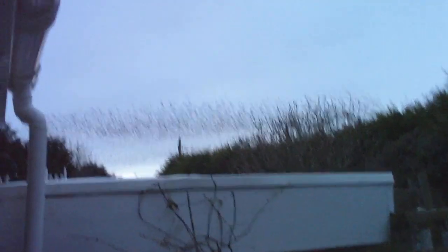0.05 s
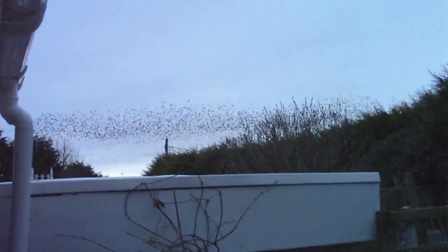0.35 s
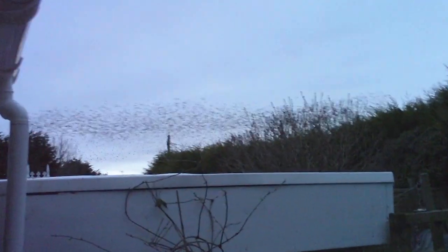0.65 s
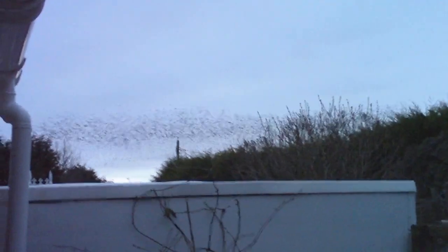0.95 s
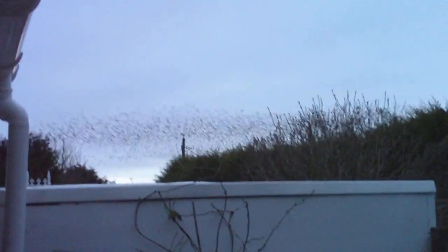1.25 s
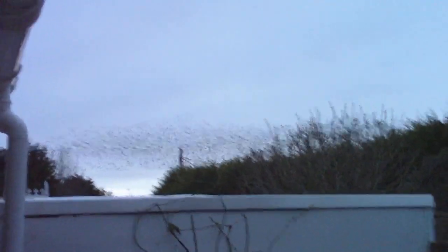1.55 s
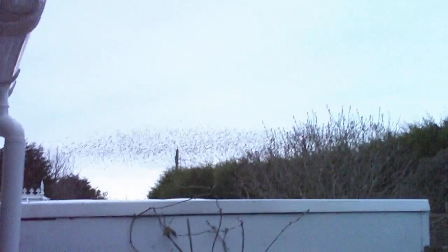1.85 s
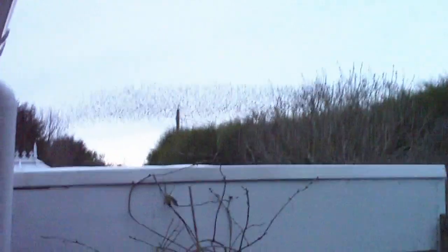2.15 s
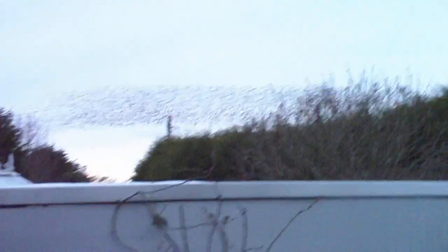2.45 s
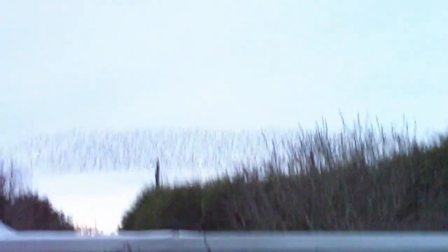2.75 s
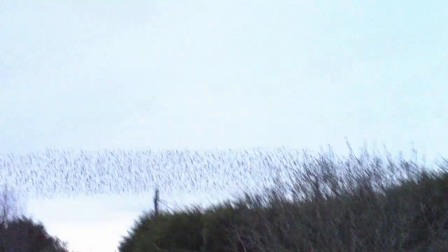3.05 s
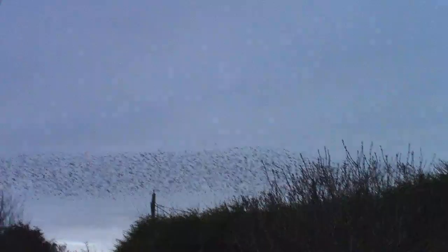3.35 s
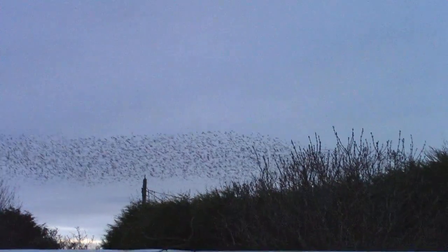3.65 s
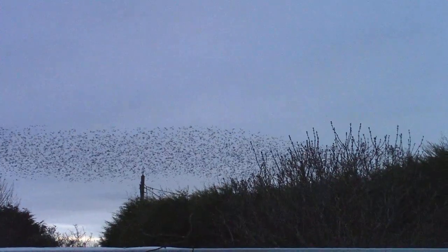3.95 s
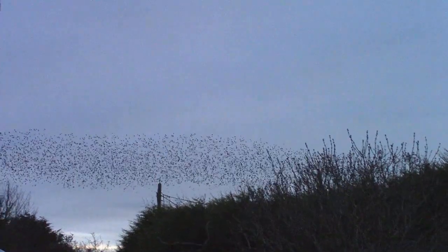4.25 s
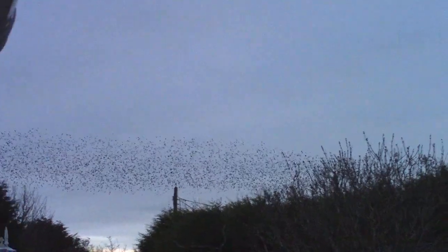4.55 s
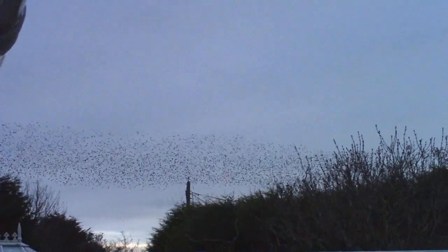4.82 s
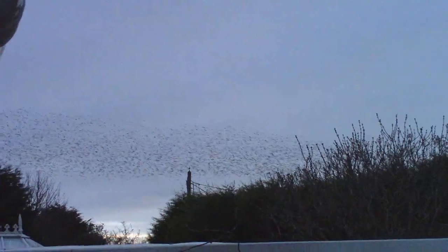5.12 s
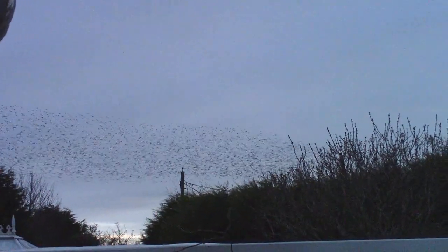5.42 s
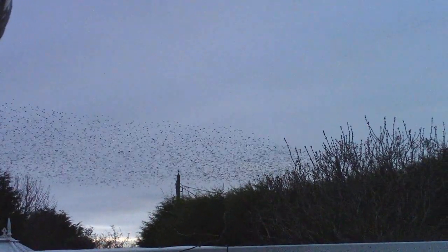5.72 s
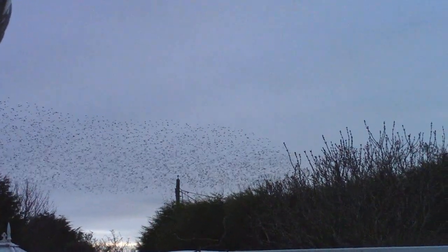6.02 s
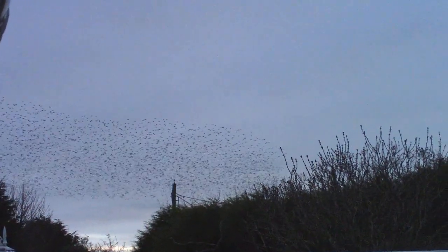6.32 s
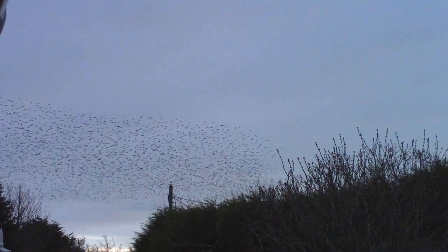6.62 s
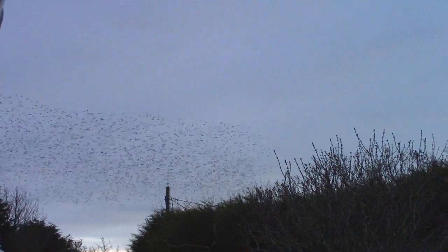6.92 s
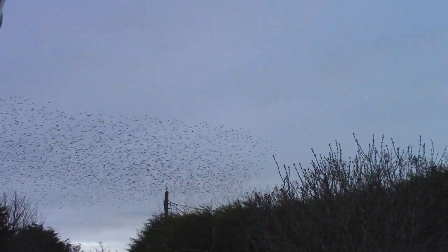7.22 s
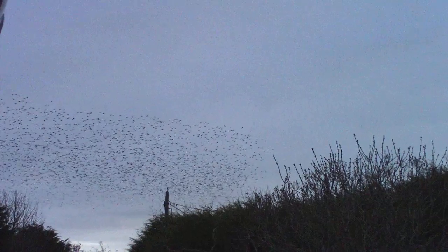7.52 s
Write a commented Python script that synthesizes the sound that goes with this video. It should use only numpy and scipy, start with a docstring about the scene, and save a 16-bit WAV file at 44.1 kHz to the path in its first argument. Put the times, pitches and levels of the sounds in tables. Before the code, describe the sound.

Soft open-air hiss and the dense, high chatter of many starlings run throughout, fairly quiet, in a garden. Brief squeaks, sliding whistles, trills and harsh rasps stand out from the distant flock and thicken in the last two seconds. The camera's plastic case snaps sharply now and then, much closer and louder than the birds, and its microphone picks up a very faint electronic whine.

```python
"""A soft outdoor wash and the babble of a large starling flock go on throughout, behind nearer calls.
The nearest birds whistle, rasp, buzz, chirp and yelp by blowing air through the syrinx, their two-sided
voice box; a garden wall and hedge throw the calls back. A hand-held camera, whose one microphone hears
it all, whines faintly, and now and then its plastic case clicks sharply."""
import sys
import numpy as np
from scipy import signal
from scipy.fft import rfft, irfft, next_fast_len
from scipy.io import wavfile
from scipy.ndimage import uniform_filter1d

SR = 44100
rng = np.random.default_rng(int(sys.argv[2]) if len(sys.argv) > 2 else 0)


def materialize(psi):
    """Save the field psi as 16-bit PCM at rate SR to the path in sys.argv[1].

    A 1-D psi becomes a single channel; in a 2-D psi each row is a channel.
    """
    bounded = np.clip(np.atleast_2d(psi).T, -1, 1)
    quanta = np.round(bounded * 32767).astype(np.int16)
    wavfile.write(sys.argv[1], SR, quanta)


N = 338688
TIME = np.arange(N) / SR


def gain_of(db):
    """Turns decibels into a number to multiply by."""
    return 10 ** (np.asarray(db) / 20)


def unit_rms(x):
    """Scales a sound to an average strength (rms) of 1."""
    return x / np.sqrt(np.mean(x ** 2) + 1e-20)


def at_frequency(points, hz):
    """Looks up values between a table's frequencies, spaced by octaves."""
    f, value = np.transpose(points)
    return np.interp(np.log(hz + 1), np.log(f + 1), value)


def add(mix, start_s, sound):
    """Mixes a sound in at its start time."""
    part = mix[max(round(start_s * SR), 0):][:len(sound)]
    part += sound[:len(part)]


def play(table, call):
    """Makes one call for each row; the first column says when."""
    out = np.zeros(N)
    for start_s, *settings in table:
        add(out, start_s, call(*settings))
    return out


def band(x, hz, width_hz):
    """Keeps the sound near one frequency, at an rms of 1."""
    size = next_fast_len(len(x))
    f = np.fft.rfftfreq(size, 1 / SR)
    peak = 1 / (1 + ((f - hz) / width_hz) ** 2) ** 2
    return unit_rms(irfft(rfft(x, size) * peak, size)[:len(x)])


def noise(n):
    """White noise, at most half a second."""
    return rng.standard_normal(SR // 2)[:n]


def wander(n, rate_hz):
    """A random drift of about size 1."""
    return np.interp(np.arange(n) * rate_hz / SR, np.arange(512), rng.standard_normal(512))


def progress(length_s):
    """Runs from 0 to 1 through a call; named u below."""
    return np.linspace(0, 1, int(np.clip(length_s, .005, .45) * SR))


def swell(u, roundness):
    """Fades a call in and out; less roundness gives a flatter top."""
    return unit_rms(abs(np.sin(np.pi * u)) ** roundness * signal.windows.tukey(len(u), .42))


def phase(hz):
    """The angle a wave has turned through as its pitch changes."""
    return 2 * np.pi * np.cumsum(hz) / SR


def glide(u, hz, octaves):
    """A pitch that slides steadily, passing hz halfway."""
    return hz * 2 ** (octaves * (u - .5))


# tone colour of the open air and the farthest birds: f/Hz, relative level/dB
AIR_COLOUR = [(25, 3), (59, 2), (140, -7.5), (253, -0.5), (349, -6), (500, -3), (650, -6), (900, -3.5),
              (1400, -8), (2500, 1), (4000, -6), (5700, -5), (8100, -10.5), (10600, -19), (12200, -18.5),
              (15500, -24.5)]
# how hard the flock chatters: t/s, relative level/dB
CHATTER_WAVES = [(0, 1), (.6, -1.5), (.92, -5.5), (1.35, 7), (2.3, -2.5), (2.9, 4), (3.45, 9), (4.6, 2),
                 (4.95, 0.5), (5.8, 13), (6.3, 7), (6.82, 9), (7.25, 10), (7.6, 4)]


def outdoor_air(level_db=-52.5, patchy_db=1.79, babble_share=0.42, size=1024):
    """A soft wash with drifting patches; its treble, the farthest birds, ebbs with the chatter."""
    hz = np.fft.rfftfreq(size, 1 / SR)
    real, imag, patches = rng.standard_normal((3, len(hz), 4 * N // size + 5))
    patches = uniform_filter1d(patches, size=10, axis=0)  # smooth across pitch
    patches = unit_rms(uniform_filter1d(patches, size=14, axis=1))  # and across time
    chatter = np.interp(np.linspace(0, N / SR, real.shape[1]), *np.transpose(CHATTER_WAVES))
    bird_range = np.exp(-((hz - 5600) / 2300) ** 2)
    babble_db = babble_share * np.outer(bird_range, chatter)
    colour_db = at_frequency(AIR_COLOUR, hz)[:, None] + patchy_db * patches + babble_db
    spectrum = (real + 1j * imag) * gain_of(colour_db)
    wash = signal.istft(spectrum, nperseg=size, noverlap=size - size // 4)[1][:N]
    return gain_of(level_db) * unit_rms(wash)


def far_flock(calls_per_kind=130):
    """Distant birds call at random: mellow whistles go on evenly, shrill calls come in waves."""
    mellow, shrill = np.zeros((2, N))
    for _ in range(calls_per_kind):
        low_shift, high_shift, rasp_shift, closeness, slide = rng.uniform(-2, 2, 5)
        length_s = rng.uniform(.03, .09)
        low_hz, high_hz = 2700 * np.exp(.17 * low_shift), 5700 * np.exp(.16 * high_shift)
        calls = [whistle(length_s, high_hz, slide - 1, db=-70),
                 chirp(5700 * np.exp(.06 * high_shift), db=-69),
                 buzz(length_s, high_hz, trill_hz=188, db=-70),
                 rasp(length_s, 3500 * np.exp(.18 * rasp_shift), db=-71.5, hiss_db=-77)]
        gain = gain_of(2.5 * closeness)
        add(mellow, rng.uniform(0, N / SR), gain * whistle(length_s, low_hz, slide, db=-67))
        for call in calls:
            add(shrill, rng.uniform(0, N / SR), gain * call)
    return mellow + shrill * gain_of(np.interp(TIME, *np.transpose(CHATTER_WAVES)))


def camera_whine(pulsing_db=-73, steady_db=-82, sizzle_db=-73, pulse_hz=15, switch_s=2.92):
    """Faint electronics: a thin sizzle, and a pulsing tone that gives way to a higher, steady one."""
    pulses = np.clip(4 * np.cos(2 * np.pi * pulse_hz * (TIME - .005)), 0, 1)
    pulsing = gain_of(pulsing_db) * unit_rms(pulses * np.sin(2 * np.pi * 11989 * TIME))
    steady = gain_of(steady_db) * unit_rms(np.sin(2 * np.pi * 14987 * TIME))
    sizzle = gain_of(sizzle_db) * band(rng.standard_normal(N), hz=7840, width_hz=170)
    return sizzle + np.where(TIME < switch_s, pulsing, steady)


def sing(hz, rough, waver=0.0094, flutter_db=3.5, overtone_db=-29):
    """One side of the voice box sings an almost pure tone, trembling a little."""
    n = len(hz)
    angle = phase(hz * (1 + waver * wander(n, 230.5) + rough * wander(n, 1007)))
    tone = np.sin(angle) + gain_of(overtone_db) * np.sin(2 * angle)
    return tone * gain_of(flutter_db * wander(n, 232))


# whistles, the low ones from far off: t/s, length/s, middle f/Hz, slide/(octaves per s), level/dB
WHISTLE_CALLS = [(0, 0.084, 2420, -1.4, -54.5), (.08, 0.1005, 2240, -0.7, -58),
                 (0.609, 0.047, 2000, 0.5, -58.5), (0.711, 0.059, 1341, 5, -57.5),
                 (1.373, .055, 3470, -4, -51.5), (1.86, 0.13, 4880, -2.1, -50.5),
                 (2.373, 0.069, 4100, .6, -56), (2.474, .12, 4950, -1, -46),
                 (2.891, 0.051, 2300, -0.5, -57.5), (3.09, .08, 4050, 0, -56), (3.21, .08, 2680, 1, -54.5),
                 (3.277, 0.095, 5250, -4, -49.5), (3.528, 0.042, 5130, 14.5, -46),
                 (3.883, .037, 1464, 1, -57.5), (4.075, 0.069, 4120, 4.5, -57.5),
                 (4.087, 0.057, 4920, -1, -58), (4.453, 0.071, 2930, -0.5, -56.5), (4.6, .06, 2440, 0, -58),
                 (4.889, 0.047, 4220, -3.5, -61), (5.338, 0.063, 4800, 0, -53.5),
                 (5.395, 0.15, 5420, -1.6, -52.5), (5.478, 0.1, 6350, -4.5, -50),
                 (7.03, 0.049, 2834, -4, -52.5)]


def whistle(length_s, hz, slide, db):
    """A clear note that slides up or down at a steady rate."""
    u = progress(length_s)
    tone = sing(glide(u, hz, slide * length_s), rough=0.018)
    return gain_of(db) * unit_rms(tone * swell(u, 0.059))


# how long the garden echoes: f/Hz, time to fade by 60 dB/s
ECHO_FADES = [(500, 0.036), (4000, 0.38), (12000, 0.072)]


def garden_echo(x):
    """Wall, house and hedge scatter the calls back; the middle treble lingers longest."""
    bounces = rng.standard_normal(SR // 2) * (rng.random(SR // 2) < .05)
    hz, t, spectrum = signal.stft(bounces, SR, nperseg=256)
    fade = gain_of(-60 * t / at_frequency(ECHO_FADES, hz)[:, None])
    tail = signal.istft(spectrum * fade, SR)[1]
    tail = np.r_[np.zeros(SR // 200), tail]  # arrives 5 ms late
    return signal.fftconvolve(x, tail / np.linalg.norm(tail))[:N]


def squeal(hz, ragged_db=4, overtone_db=-18):
    """One side of the voice box, blown too hard, gives a rough and broken tone."""
    n = len(hz)
    angle = phase(hz * (1 + .03 * wander(n, 260) + .05 * wander(n, 1600)))
    tone = np.sin(angle) + gain_of(overtone_db) * np.sin(2 * angle)
    return unit_rms(tone * gain_of(ragged_db * np.clip(wander(n, 202), -2, 2)))


def rasp(length_s, hz, db, hiss_db, breath_db=0, puff_hz=160, fall_share=.18):
    """Both sides of the voice box squeal over puffs of air; the open beak lets hiss through."""
    u = progress(length_s)
    beats = phase(puff_hz * (1 + 0.33 * wander(len(u), 202)))
    puffs = noise(len(u)) * gain_of(3 * np.cos(beats) + 2.1 * wander(len(u), 112))
    pitch = hz * (1 + fall_share * (.5 - u))
    voice = unit_rms(squeal(pitch) + gain_of(-5) * squeal(1.2 * pitch))
    throat = unit_rms(voice + gain_of(breath_db) * band(puffs, 0.9 * hz, 1900))
    beak = band(puffs, 8170, 2300) + gain_of(-16.5) * band(puffs, 13500, 2800)
    return gain_of(db) * throat * swell(u ** 0.68, 0.65) + gain_of(hiss_db) * beak * swell(u, 0.45)


# harsh squawks: t/s, length/s, level before the boost/dB
RASP_CALLS = [(0.071, 0.084, -56), (0.265, 0.078, -55.5), (0.47, 0.23, -57.5), (0.686, 0.082, -55.5),
              (1.082, 0.15, -55), (1.341, 0.14, -55), (1.671, 0.066, -52), (2.036, 0.13, -52.5),
              (2.268, 0.051, -53), (2.486, 0.14, -53), (2.962, 0.06, -47), (3.573, 0.069, -52),
              (3.78, 0.028, -52), (4.323, 0.075, -55.5), (4.586, .14, -53.5), (5.149, 0.1, -49.5),
              (5.483, 0.079, -53.5), (5.666, 0.14, -55), (5.792, 0.061, -47), (5.869, 0.12, -52.5),
              (5.993, .13, -55), (6.102, 0.072, -46.5), (6.223, 0.11, -47), (6.437, 0.04, -54.5),
              (6.504, 0.054, -52), (6.668, 0.14, -53), (6.974, 0.15, -49), (7.172, 0.1, -53),
              (7.439, 0.096, -48.5), (7.587, 0.1, -51.5)]
# a faint and a loud throat: level before the boost/dB, f/Hz, breath compared with voice/dB
RASP_THROATS = [(-57, 3800, 4), (-54.5, 5100, -3.5)]
# hiss from the beak: t/s, level compared with the throat/dB
BEAK_HISS = [(0, -17), (1.3, -7), (2.05, -29), (3, -15), (4.6, -6), (5.1, -15), (5.55, -8), (7.1, -5.5),
             (7.45, -16)]


def near_rasps(boost_db=3):
    """Squawks that stand out of the flock; the faint ones are farther off, duller and breathier."""
    out = np.zeros(N)
    levels, pitches, breaths = np.transpose(RASP_THROATS)
    for start_s, length_s, db in RASP_CALLS:
        hz, breath_db = np.interp(db, levels, pitches), np.interp(db, levels, breaths)
        hiss_db = db + np.interp(start_s, *np.transpose(BEAK_HISS))
        add(out, start_s, gain_of(boost_db) * rasp(length_s, hz, db, hiss_db, breath_db))
    return out


# notes the camera's case rings with: f/Hz, relative level/dB, time to fade by 60 dB/s
CASE_NOTES = [(2640, 9, 0.0046), (4590, 0, 0.034), (6320, 28, 0.002), (7360, 19, 0.0013),
              (10860, 14.5, 0.0017)]
# clicks of the case: t/s, snap level/dB, knock level/dB, thud level/dB
CASE_CLICKS = [(0.1323, -39, -37, -53), (0.3184, -16, -52, -31.5), (1.0679, -32, -56, -33.5),
               (1.2486, -30, -61, -68), (1.7553, -18, -47, -31.5), (2.6489, -15.5, -30, -28.5),
               (2.6516, -16, -25.5, -44), (2.6606, -20, -32, -69), (2.668, -25, -45, -62),
               (2.8778, -31, -60, -66), (6.466, -27, -53, -65), (7.154, -24, -44, -66),
               (7.1579, -17.5, -34.5, -64), (7.4227, -6, -25, -35.5)]


def camera_clicks(thud_hz=140, thud_fade_s=0.012, knock_hz=1280, knock_fade_s=0.0077, rattle_s=0.0011):
    """A snap and a brief rattle ring the plastic case; its hollow body knocks and the push thuds."""
    out, t = np.zeros(N), np.arange(SR // 20) / SR
    ring = sum(gain_of(db - 60 * t / fade_s) * np.sin(2 * np.pi * hz * t)
               for hz, db, fade_s in CASE_NOTES)
    # so small a case gives off little bass
    ring = signal.lfilter(*signal.butter(2, 1700, "high", fs=SR), ring)
    thud = np.sin(2 * np.pi * thud_hz * t) * gain_of(-60 * t / thud_fade_s)
    knock = np.sin(2 * np.pi * knock_hz * t) * gain_of(-60 * t / knock_fade_s)
    knock = signal.lfilter(*signal.butter(1, 350, "high", fs=SR), knock)
    for start_s, snap_db, knock_db, thud_db in CASE_CLICKS:
        rattle = 0.17 * noise(len(t)) * np.exp(-t / rattle_s)
        rattle[0] += 1  # the first sharp hit
        snap = signal.fftconvolve(rattle, ring)[:len(t)]
        snap /= abs(snap).max()
        add(out, start_s, gain_of(snap_db) * snap + gain_of(knock_db) * knock + gain_of(thud_db) * thud)
    return out


# buzzy notes: t/s, length/s, middle f/Hz, trill rate/Hz, level/dB
BUZZ_CALLS = [(0.867, 0.14, 6340, 280, -50), (0.981, 0.14, 4990, 190, -56.5),
              (1.14, 0.09, 6780, 170, -53.5), (1.292, 0.043, 3310, 150, -52.5),
              (1.911, 0.19, 5490, 200, -52), (2.266, 0.1, 6510, 210, -50), (3.135, 0.18, 5220, 174, -44),
              (3.582, 0.042, 4830, 104, -44), (3.607, 0.14, 6060, 72, -49), (4.147, 0.031, 5870, 96, -50),
              (4.392, 0.11, 7840, 240, -55.5), (4.673, 0.064, 6540, 91, -50),
              (4.737, 0.075, 7500, 130, -56.5), (5.006, 0.069, 4320, 140, -51),
              (5.418, 0.1, 6930, 150, -50.5), (5.727, 0.082, 7000, 110, -50.5),
              (6.135, 0.13, 6400, 220, -46), (6.225, 0.19, 5320, 174, -45), (6.701, 0.046, 5450, 150, -49),
              (6.877, 0.125, 6080, 130, -44.5), (6.97, 0.2, 5190, 140, -49), (7.332, 0.068, 5850, 130, -52)]


def buzz(length_s, hz, trill_hz, db, fall_octaves=.19, arch_share=0.015, throb_db=4.5):
    """A sagging note shaken by a fast, uneven trill; the throat favours its second harmonic, at hz."""
    u = progress(length_s)
    trill = phase(trill_hz * (1 + .22 * wander(len(u), 152)))
    arch = np.sin(np.pi * u)
    pitch = glide(u, hz, -fall_octaves) * (1 + arch_share * (arch - arch.mean()))
    # each beat of the trill is loudest as its pitch falls
    angle = phase(pitch - 300 * np.sin(trill) + 250 * wander(len(u), 1500))
    strength = gain_of(throb_db * np.cos(trill) + 2 * wander(len(u), 145))
    overtones = np.sin(1.5 * angle) + 0.62 * np.sin(2 * angle)
    tone = gain_of(-21) * np.sin(angle / 2) + np.sin(angle) + gain_of(-19) * overtones
    return gain_of(db) * unit_rms(tone * strength * swell(u, 0.65))


# thin, high calls: t/s, length/s, f/Hz aimed for, roughness/share of the pitch, level/dB
THIN_CALLS = [(1.199, 0.1, 8700, 0.03, -56), (3.558, 0.029, 9460, .007, -49.5),
              (3.956, 0.1, 8980, 0.0085, -43.5), (5.324, 0.093, 9600, 0.015, -56),
              (5.53, 0.15, 8800, 0.012, -56), (5.72, 0.15, 8500, .01, -54), (6.12, 0.17, 8340, .012, -53),
              (6.635, 0.18, 8390, .009, -48.5), (7.134, 0.079, 8600, 0.045, -49.5),
              (7.245, 0.096, 8800, 0.053, -49.5)]


def thin_call(length_s, hz, rough, db, scoop_share=0.0585, scoop_s=0.0087, sink_per_s=0.21):
    """A fine note scoops up and slowly sinks; the very highest strain the voice and wobble."""
    u = progress(length_s)
    t = u * length_s
    pitch = hz * (1 - scoop_share * np.exp(-t / scoop_s) - sink_per_s * t)
    strain_hz = max(hz - 8950, 0)
    wobble = strain_hz / 2 * np.cos(2 * np.pi * 31 * t)
    return gain_of(db) * unit_rms(sing(pitch + wobble, rough, waver=rough / 2) * swell(u, 0))


# squeaky chirps: t/s, throat f/Hz, level/dB
CHIRP_CALLS = [(1.557, 5250, -55), (1.767, 5000, -50.5), (2.555, 6000, -56), (3.435, 5000, -55),
               (3.847, 5700, -53), (3.93, 6200, -55), (4.837, 5800, -52), (7.32, 6300, -48.5)]


def chirp(hz, db, length_s=0.035, octaves_per_s=25, rough=0.013, flutter_db=1.5):
    """A low note shoots upward; its overtones pass one by one through the pitch the throat rings at."""
    u = progress(length_s)
    pitch = glide(u, hz / 4, octaves_per_s * length_s) * (1 + rough * wander(len(u), 950))
    harmonics = np.arange(2, 8)[:, None]
    throat = 1 / (1 + (np.log2(harmonics * pitch / hz) / .36) ** 2) ** 2
    tone = (throat * np.sin(harmonics * phase(pitch))).sum(0)
    flutter = gain_of(flutter_db * wander(len(u), 254))
    return gain_of(db) * unit_rms(tone * swell(u, .1) * flutter)


# the course of one yelp: t/s, pitch/share of the settled pitch, relative level/dB
YELP_COURSE = [(0, .84, -16), (.02, .98, -9), (.027, 1.2, -12), (.031, .97, 0), (.042, 1.02, 0),
               (.056, .98, -6), (.08, 1, -14)]
# yelps: t/s, settled f/Hz, level/dB
YELP_CALLS = [(2.073, 6000, -47), (2.195, 6350, -48), (2.689, 6220, -43.5), (2.814, 5810, -51),
              (3.537, 4700, -47)]


def yelp(hz, db):
    """A whistle climbs until it cracks, then drops onto a louder, warbling note."""
    times, shares, levels_db = np.transpose(YELP_COURSE)
    u = progress(times[-1])
    t = u * times[-1]
    tone = sing(hz * np.interp(t, times, shares), rough=0.027)
    strength = gain_of(np.interp(t, times, levels_db))
    return gain_of(db) * unit_rms(tone * strength * swell(u, 0))


def scene(near_echo_db=-9, far_echo_db=-5):
    """Near birds are fairly clear, far ones blurred by echo; both channels carry the same sound."""
    near = play(CHIRP_CALLS, chirp) + play(WHISTLE_CALLS, whistle) + play(YELP_CALLS, yelp)
    near += play(THIN_CALLS, thin_call) + play(BUZZ_CALLS, buzz) + near_rasps()
    far = far_flock()
    echo = garden_echo(gain_of(near_echo_db) * near + gain_of(far_echo_db) * far)
    mono = near + far + echo + outdoor_air() + camera_clicks() + camera_whine()
    return np.array([mono, mono])


def record(dry, cutoff_hz=15500):
    """The camera cuts off the very highest treble."""
    lowpass = signal.firwin(511, cutoff_hz, window=("kaiser", 9), fs=SR)
    return signal.oaconvolve(dry, lowpass[None], "same")


dry = scene()
out = record(dry)
materialize(out)
```